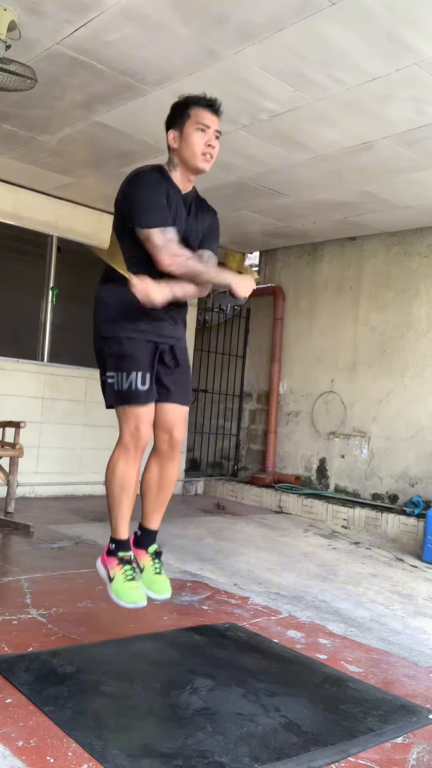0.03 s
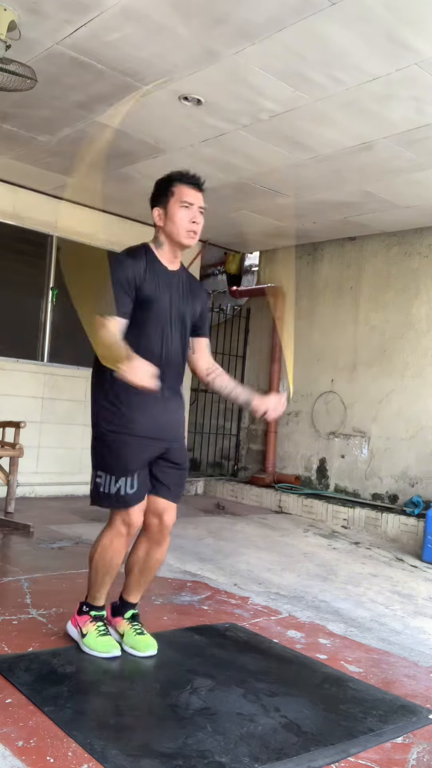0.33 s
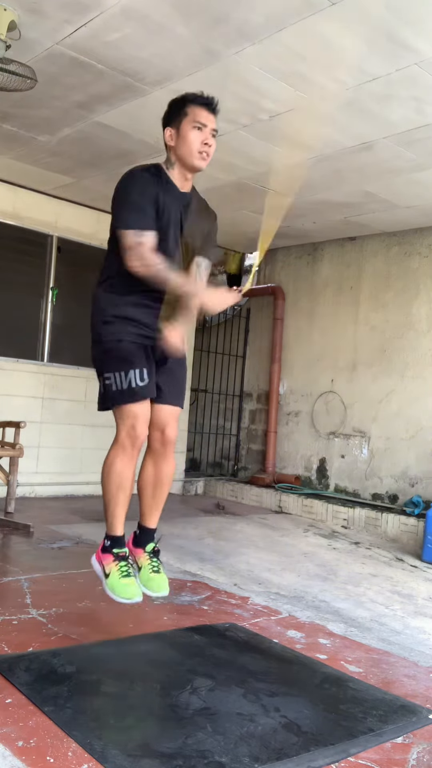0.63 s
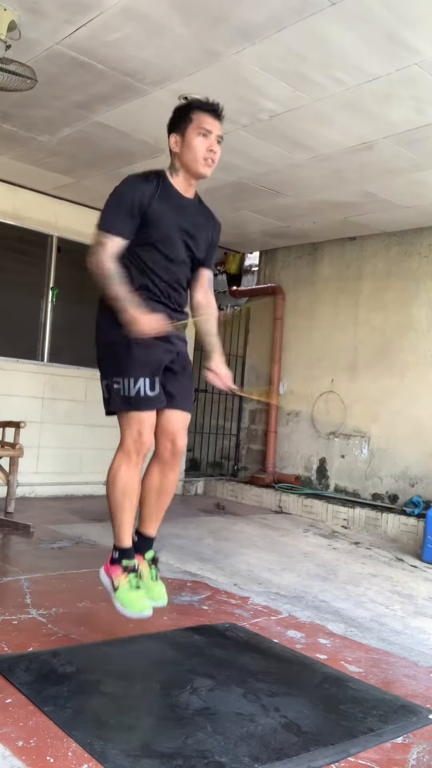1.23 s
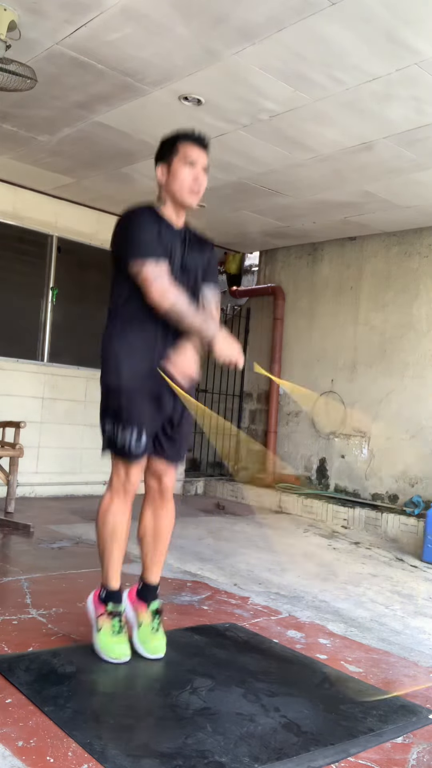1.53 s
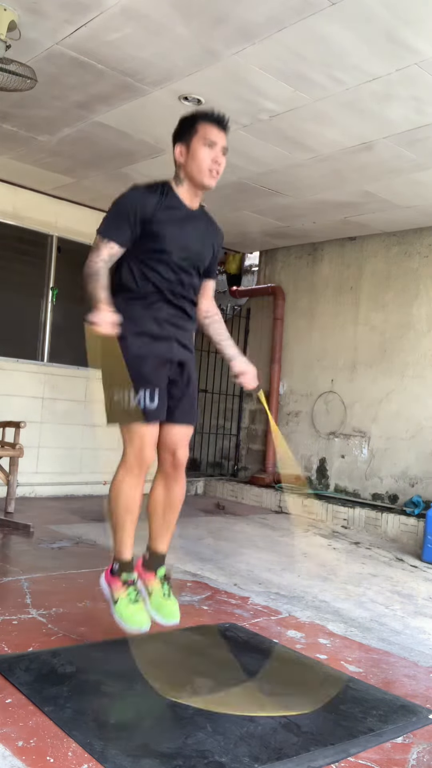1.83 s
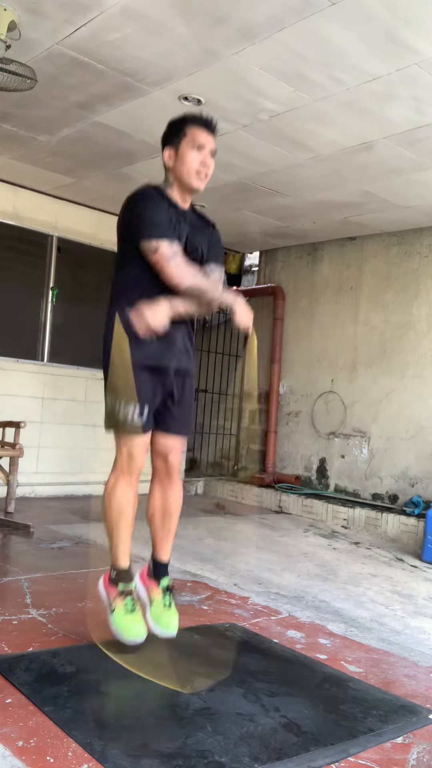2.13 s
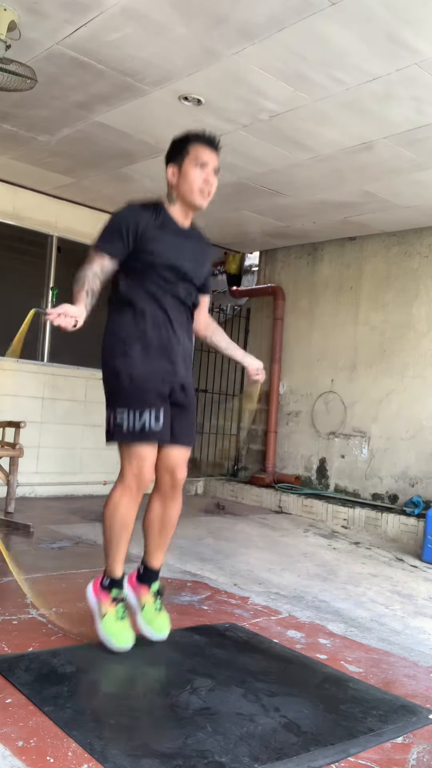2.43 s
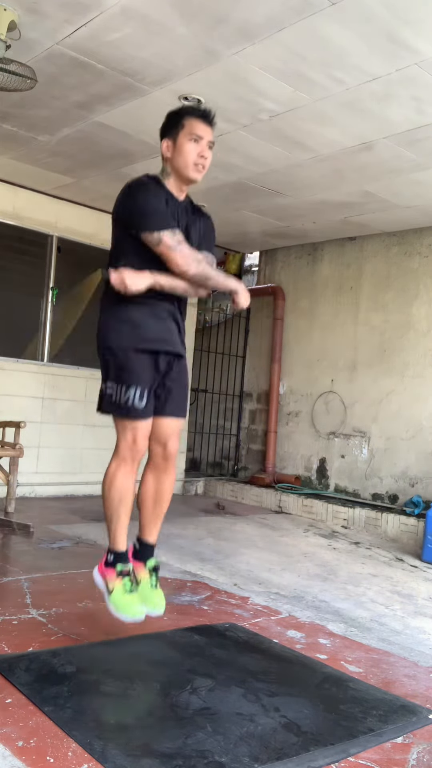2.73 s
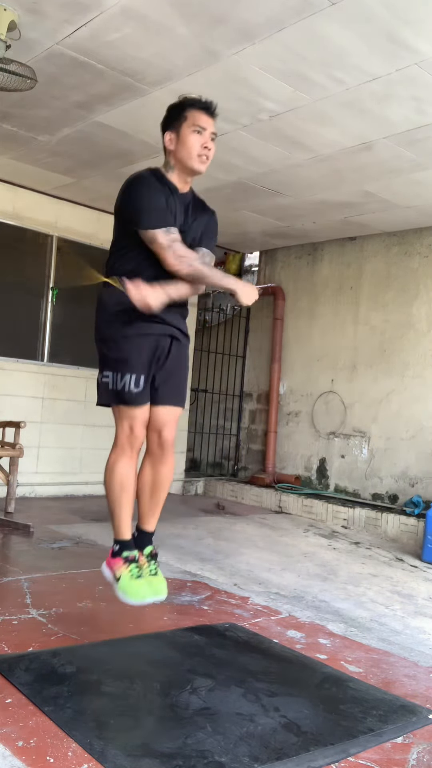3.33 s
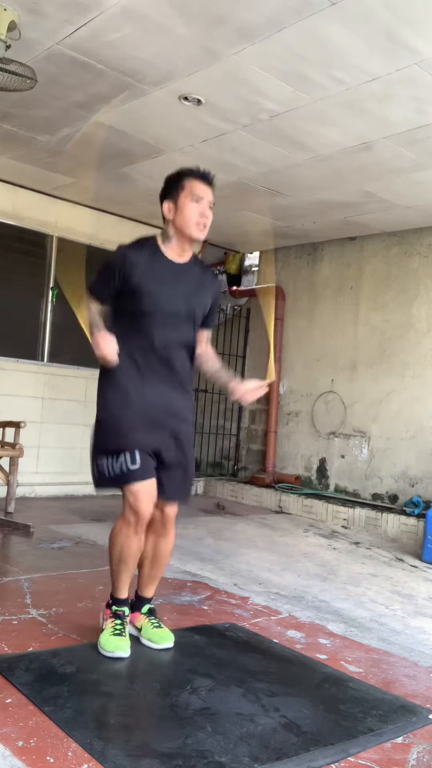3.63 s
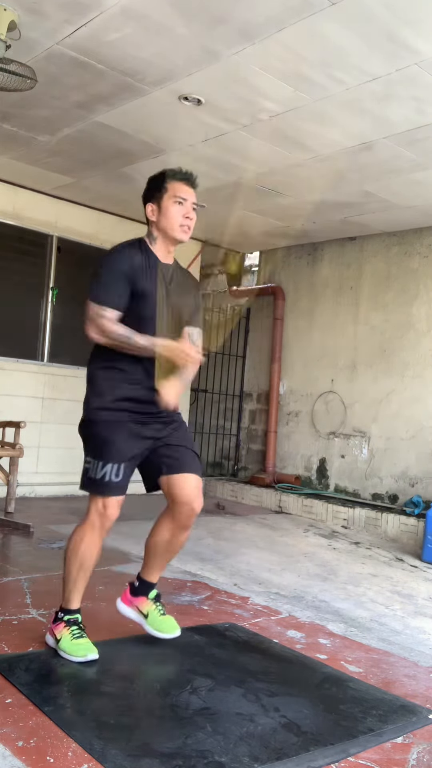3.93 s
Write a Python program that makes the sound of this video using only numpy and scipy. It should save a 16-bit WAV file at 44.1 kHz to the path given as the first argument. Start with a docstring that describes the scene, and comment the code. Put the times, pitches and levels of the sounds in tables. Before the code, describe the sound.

A skipping rope whistles and ticks quickly on a mat between regular shoe landings.

```python
"""Double-unders in a covered concrete patio.

A thin speed rope sings as it cuts the air, swelling with each pass of its loop. It ticks twice
on a rubber mat, then the shoes land. Floor, wall and ceiling throw back each tick before the
patio rings on, over a low distant rumble."""
import sys
import numpy as np
from scipy import signal
from scipy.fft import rfft, irfft
from scipy.io import wavfile

SR = 44100
rng = np.random.default_rng(int(sys.argv[2]) if len(sys.argv) > 2 else 0)


def persist_wave(psi):
    """Save psi, clipped to +-1, as 16-bit WAV."""
    counts = np.round(np.clip(psi, -1, 1) * 32767).astype(np.int16)
    wavfile.write(sys.argv[1], SR, np.atleast_2d(counts).T)


N = 176400

# Air tone swells. Each row: peak time in seconds, nominal pitch in Hz, relative level in dB,
# half-length in seconds, glide in octaves per second.
CORD_SWELLS = [(.042, 1060, -1.5, 0.0071, 5.5), (.075, 1270, -8, 0.0095, 2), (0.13, 900, -12, 0.0065, 0),
               (.17, 1090, 0, .0025, 2), (0.201, 1110, 1.5, 0.0094, 1.5), (0.477, 1058, 1.5, 0.0044, 8.5),
               (0.488, 1402, -1, 0.0027, 10), (0.513, 1080, -7.5, 0.0077, -6.5),
               (0.629, 1255, -5, .015, -1.5), (0.694, 949, -4.5, 0.01, 3.5), (0.746, 1106, -1, .014, 1),
               (1.036, 1417, -3, 0.0052, -2.5), (1.047, 1120, -3.5, 0.0079, -5.5),
               (1.11, 880, -6, 0.0073, 3), (1.17, 1268, -6, 0.021, 1.5), (1.228, 802, -20, 0.0065, -3.5),
               (1.297, 1150, 4, 0.0098, 0), (1.565, 1020, 1.5, 0.0048, -3), (1.6, 1239, -6.5, 0.0063, 2.5),
               (1.712, 1350, -5, .011, 2), (1.831, 1078, -1, 0.013, 3.5), (2.136, 1414, -6, 0.0054, -2),
               (2.162, 1129, 0.5, 0.0066, -2), (2.242, 1087, -1.5, 0.0051, 12),
               (2.288, 1309, -10, 0.016, 2.5), (2.383, 1148, 1.5, 0.002, -0.5),
               (2.414, 1119, 2.5, 0.0079, 0.5), (2.688, 1008, -6.5, 0.004, 5), (2.715, 1206, -6, 0.013, -4),
               (2.826, 1296, -3.5, 0.0081, -3.5), (2.945, 1128, -0.5, 0.011, 6.5),
               (2.9785, 1131, 5.5, 0.0025, 0.5), (3.014, 980, 4.5, 0.003, -6.5),
               (3.254, 1189, -5, .009, 11.5), (3.388, 1303, -6.5, 0.014, 1), (3.491, 1126, 2, 0.0027, 1),
               (3.512, 1134, 0, 0.0093, -2), (3.552, 1000, 6, 0.0042, -5.5), (3.76, 1055, -4, .005, 4.5),
               (3.788, 1265, -3.5, 0.011, 2.5), (3.889, 1102, -9, 0.0056, 0)]
# Whistle pitch, following cord speed. Each row: time in seconds, pitch in Hz.
WHISTLE_PITCH = [(0, 950), (.08, 1380), (.135, 870), (.22, 1200), (.35, 1050), (.41, 800), (.465, 1020),
                 (.49, 1480), (.56, 930), (.615, 1380), (.69, 900), (.76, 1200), (.95, 840), (1.01, 950),
                 (1.035, 1450), (1.10, 880), (1.16, 1350), (1.24, 790), (1.30, 1200), (1.48, 1090),
                 (1.53, 900), (1.565, 1020), (1.595, 1350), (1.67, 880), (1.715, 1380), (1.81, 980),
                 (1.87, 1200), (2.02, 1080), (2.07, 800), (2.12, 950), (2.15, 1400), (2.22, 950),
                 (2.29, 1380), (2.36, 980), (2.41, 1150), (2.58, 1080), (2.63, 860), (2.67, 900),
                 (2.70, 1380), (2.77, 950), (2.84, 1380), (2.91, 820), (2.96, 1200), (3.13, 1040),
                 (3.18, 780), (3.24, 950), (3.27, 1400), (3.33, 900), (3.385, 1350), (3.45, 930),
                 (3.51, 1180), (3.65, 1080), (3.70, 860), (3.75, 1000), (3.80, 1350), (3.85, 800),
                 (3.92, 1200), (4, 950)]
# Hiss of the cord's wake. Each row: frequency in Hz, relative level in dB.
WAKE_SPECTRUM = [(300, -12.5), (700, -18), (1500, 3), (2200, 1), (3600, -0.5), (5000, -7), (9000, -11.5),
                 (16000, -19)]
# Rope on mat. Each row: start in seconds, relative tick level in dB, relative slap level in dB.
ROPE_STRIKES = [(.2376, -1, -4.5), (.5184, -4.5, -5), (.7883, 0.3, -0.5), (1.069, -8.5, -16),
                (1.3351, -2.5, -4.5), (1.6104, -5.5, -8.5), (1.8883, -4.7, -4.5), (2.1692, -3.5, -7),
                (2.4455, -2.4, 0.5), (2.7304, -8.5, -8), (3.0043, -3, -2), (3.2891, -3.5, -4),
                (3.5515, 0.5, -3.5), (3.8188, -7.5, -6.5)]
# Cord contact noise. Each row: frequency in Hz, relative level in dB.
TICK_SPECTRUM = [(400, -8), (1000, 9), (2000, 5), (3200, 5.5), (5000, 2.5), (7500, 1.5), (11500, 1.75),
                 (16000, -3)]
# Ring of the struck mat. Each row: frequency in Hz, relative level in dB, decay in seconds.
MAT_MODES = [(574, -10, 0.0023), (840, 23, 0.0016), (1150, 24, 0.00057), (1710, 2.5, 0.0014),
             (3000, -16, 0.00088)]
# Shoes on mat. Each row: start in seconds, then relative scuff, thud and clap levels in dB.
SHOE_LANDINGS = [(.287, -1, -16, -6), (0.836, 2.5, -1, -3), (1.384, -1.5, -1, -4), (1.941, -1, -1, 2.5),
                 (2.494, -0.5, -2, -10.5), (3.056, 0.5, -18, -6.5), (3.608, -1, -19, 4)]
# Sole touching rubber. Each row: frequency in Hz, relative level in dB.
SCUFF_SPECTRUM = [(60, -3), (120, 3.5), (180, 4), (235, -5.5), (290, -1), (370, -9.5), (500, 3), (750, -4),
                  (1300, -12), (2500, -12.5), (5000, -18), (14000, -25)]
# Forefoot clapping flat. Each row: frequency in Hz, relative level in dB.
CLAP_SPECTRUM = [(100, -6), (250, -21), (390, -15), (520, 3), (750, 5), (1200, -8), (3000, -34),
                 (14000, -31.5)]
# Floor, wall, ceiling. Each row: delay in seconds, relative level in dB, left-side lag in seconds.
REFLECTIONS = [(.0024, -16.5, 0.00013), (.0076, -3.5, .00014), (0.0118, -6, .00009)]
# Patio reverberation. Each row: frequency in Hz, time to fall 60 dB in seconds.
PATIO_T60 = [(60, 0.27), (250, 0.53), (1000, 0.84), (2500, 0.57), (6000, 0.53), (15000, 0.37)]
# Distant rumble. Each row: frequency in Hz, relative level in dB.
RUMBLE_SPECTRUM = [(20, -44), (35, -12), (50, -8), (68, -5), (95, -1.5), (130, -11), (200, -15), (350, -32),
                   (800, -8), (2000, -24), (5000, -32), (16000, -37.5)]
# Hum within the rumble. Each row: frequency in Hz, level in dB.
HUM_TONES = [(69.5, -47.5), (89, -75), (161, -60.5)]


def whoosh(t):
    """The cord whistles up and down with its speed; each fast sweep adds a gliding swell and hiss."""
    glide_limit_oct, drive_span_s, idle_drive = 0.3, 0.042, 0.55
    swells, effort, drive = np.zeros((3, N))
    for at_s, hz, db, half_s, glide_oct_per_s in CORD_SWELLS:
        age_s = t - at_s
        near = np.abs(age_s) < 0.25
        envelope = undb(db) * np.exp(-(age_s / (2 * half_s)) ** 2)
        bend_oct = glide_limit_oct * np.tanh(glide_oct_per_s * age_s[near] / glide_limit_oct)
        swells[near] += envelope[near] * air_tone(0.98 * hz * 2 ** bend_oct, width_hz=0.168 * hz)
        effort += envelope
        skewed_s = np.where(age_s < 0, 2 * age_s, age_s)  # rises twice as fast as it falls
        drive = np.maximum(drive, np.exp(-(skewed_s / (2 * drive_span_s)) ** 2))
    pitch_hz = np.interp(t, *np.array(WHISTLE_PITCH).T)
    width_hz, slow_width_hz = 0.076 * pitch_hz.mean(), 0.091 * pitch_hz.mean()
    fast = air_tone(pitch_hz, width_hz) * np.maximum(drive, idle_drive)
    slow = undb(-4) * air_tone(0.8 * pitch_hz, slow_width_hz) * drive  # cord nearer the hands
    overtone = undb(-26.5) * air_tone(3 * pitch_hz, 3 * width_hz) * drive
    hiss = effort * colour(rng.standard_normal(N), WAKE_SPECTRUM)
    return undb(-22) * swells + undb(-32) * (fast + slow + overtone) + undb(-36.5) * hiss


def air_tone(hz, width_hz):
    """Tone of wandering strength and phase, as from vortices shed by a cord; rms 1."""
    lowpass = signal.butter(3, width_hz / 2, fs=SR, output="sos")
    noise = rng.standard_normal(len(hz) + SR) + 1j * rng.standard_normal(len(hz) + SR)
    wander = signal.sosfilt(lowpass, noise)[SR:]
    wander /= np.sqrt(np.abs(wander) + 1e-9)  # evens the level
    return unit(np.real(wander * np.exp(2j * np.pi * np.cumsum(hz) / SR)))


def rope_strikes(t):
    """Crack, brief skid and slap of the mat; each strike hits a new spot, with its own echoes."""
    skid_decay_s, slap_highpass_hz, crack_samples = 0.003, 630, 256
    strikes, age_s = np.zeros((2, N + SR)), t[:SR]
    ring = -sum(undb(db) * np.sin(2 * np.pi * hz * age_s) * np.exp(-age_s / decay_s)
                for hz, db, decay_s in MAT_MODES)
    ring = signal.sosfilt(signal.butter(2, slap_highpass_hz, "high", fs=SR, output="sos"), ring)
    ring /= np.linalg.norm(ring)
    skid = np.exp(-age_s / skid_decay_s)
    skid *= undb(-11) / np.linalg.norm(skid)
    for at_s, tick_db, slap_db in ROPE_STRIKES:
        contact = np.pad(crack(crack_samples), (0, SR - crack_samples)) + skid * rng.standard_normal(SR)
        tick = colour(np.roll(contact, crack_samples), TICK_SPECTRUM)  # lead-in for filter pre-ring
        start = int(at_s * SR)
        lead_in = start - crack_samples
        strikes[:, lead_in:lead_in + SR] += undb(tick_db + 8.5) * patio(tick, early_db=-2.5, tail_db=0.5)
        strikes[:, start:start + SR] += undb(slap_db + 7) * patio(ring, early_db=-6.5, tail_db=-0.1)
    return strikes[:, :N]


def crack(size, decay_s=0.0004):
    """Very short burst of contact noise with an even spectrum."""
    burst = np.exp(-np.arange(size) / SR / decay_s) * rng.standard_normal(size)
    spectrum = rfft(burst, 2 * size)
    return irfft(spectrum / np.abs(spectrum))[:size]


def soles(t):
    """Two soles touch the rubber in quick succession; a forefoot claps flat."""
    rise_s, fall_s, second_foot_s = 0.0011, 0.02, 0.0295
    clap_lag_s, clap_fall_s = 0.014, 0.005
    press, clap = np.zeros((2, N))
    for at_s, scuff_db, _, clap_db in SHOE_LANDINGS:
        for lag_s in (0, second_foot_s):
            age_s = np.maximum(t - at_s - lag_s, 0)
            press += undb(scuff_db) * (1 - np.exp(-age_s / rise_s)) * np.exp(-age_s / fall_s)
        age_s = t - at_s - clap_lag_s
        clap += undb(clap_db) * (age_s > 0) * np.exp(-np.abs(age_s) / clap_fall_s)
    scuffs = undb(-27.5) * press * colour(rng.standard_normal(N), SCUFF_SPECTRUM)
    claps = undb(-17) * clap * colour(rng.standard_normal(N), CLAP_SPECTRUM)
    return scuffs + claps


def thuds(t, hz=70, lag_s=0.0296, rise_s=0.019):
    """Body weight sinks into the mat: a few low cycles per landing."""
    heels_s, heels_db = 3.655, -25.5  # the last landing sinks onto the heels
    loads = [(at_s + lag_s, thud_db - 34.5) for at_s, _, thud_db, _ in SHOE_LANDINGS]
    weight = np.zeros(N)
    for at_s, db in loads + [(heels_s, heels_db)]:
        age_s = np.maximum(t - at_s, 0)
        envelope = age_s / rise_s * np.exp(1 - age_s / rise_s)
        weight += undb(db) * envelope * np.sin(2 * np.pi * hz * age_s)
    return weight


def patio(x, early_db, tail_db):
    """Direct sound from the side, dulled by shading; hard bright reflections; then the tail."""
    left_lag_s, shade_hz = 0.00011, 6940
    direct = np.zeros((2, SR))
    direct[0, int(left_lag_s * SR)] = direct[1, 0] = 1
    response = signal.sosfilt(signal.butter(1, shade_hz, fs=SR, output="sos"), direct)
    response += undb(tail_db) * patio_tail()
    for delay_s, db, lag_s in REFLECTIONS:
        response[0, int((delay_s + lag_s) * SR)] += undb(db + early_db)
        response[1, int(delay_s * SR)] += undb(db + early_db)
    energy = 1 + undb(tail_db) ** 2 + sum(undb(db + early_db) ** 2 for _, db, _ in REFLECTIONS)
    return signal.fftconvolve(x[None], response / np.sqrt(energy), axes=1)[:, :len(x)]


def patio_tail(build_s=0.0043, clump_s=0.0036, clump_db=3):
    """Clumps of echoes build up and die away, the midrange last; energy about 1 per side."""
    t, hz = np.arange(SR) / SR, np.fft.rfftfreq(SR, 1 / SR)
    clumps = undb(clump_db * np.interp(t / clump_s, np.arange(SR), rng.standard_normal(SR)))
    spectrum = rfft(diffuse(SR) * clumps)
    tail = np.zeros((2, SR))
    for centre_hz, t60_s in PATIO_T60:
        band = along([(point_hz, point_hz == centre_hz) for point_hz, _ in PATIO_T60], hz)
        tail += irfft(spectrum * band, SR) * undb(-60 * t / t60_s)
    return unit(tail * (1 - np.exp(-t / build_s))) / np.sqrt(SR)


def lingering_tick(ago_s=0.024):
    """A strike just before the start still rings in the patio."""
    tail = patio_tail()[:, int(ago_s * SR):]
    return undb(-1) * colour(np.pad(tail, ((0, 0), (0, N - tail.shape[1]))), TICK_SPECTRUM)


def rumble():
    """Distant rumble with a slightly wavering hum."""
    hum = sum(undb(db) * air_tone(np.full(N, hz), width_hz=2.4) for hz, db in HUM_TONES)
    return undb(-38) * colour(diffuse(N), RUMBLE_SPECTRUM) + hum


def diffuse(size, spacing_m=0.19, sound_m_per_s=343):
    """Noise from all around at two points: alike in the bass, unrelated in the treble."""
    coherence = np.sinc(2 * np.fft.rfftfreq(size, 1 / SR) * spacing_m / sound_m_per_s)
    weights = np.sqrt([(1 + coherence) / 2, (1 - coherence) / 2])
    mid, side = rfft(rng.standard_normal((2, size))) * weights
    return irfft(np.array([mid + side, mid - side]), size)


def colour(x, points):
    """Filter by (Hz, dB) points; white noise keeps its power."""
    size = x.shape[-1]
    gain = unit(undb(along(points, np.fft.rfftfreq(size, 1 / SR))))
    return irfft(rfft(x) * gain, size)


def along(points, hz):
    """Interpolate (Hz, value) points on a log-frequency axis."""
    point_hz, values = np.array(points).T
    return np.interp(np.log(hz + 1), np.log(point_hz), values)


def undb(db):
    """Decibels to gain."""
    return 10 ** (np.asarray(db) / 20)


def unit(x):
    """Scale to rms 1."""
    return x / np.sqrt(np.mean(x ** 2))


def scene():
    """Rope and shoes in the patio; the whoosh is a little louder on the left."""
    t = np.arange(N) / SR
    footfalls = soles(t)
    rope = patio(whoosh(t), early_db=-7, tail_db=-2.3) * undb([[1], [-1]])
    strikes = rope_strikes(t)
    shoes = patio(footfalls, early_db=3, tail_db=-0.5) + thuds(t)
    return rope + strikes + shoes + lingering_tick() + rumble()


def record(dry):
    """The left side leads in phase in the bass; the deepest lows and the top are cut."""
    lead_rad, lead_corner_hz, highpass_hz, lowpass_hz = 0.43, 300, 36, 16000
    hz = np.fft.rfftfreq(N, 1 / SR)
    phase_rad = lead_rad * np.exp(-(hz / lead_corner_hz) ** 2)
    wet = irfft(rfft(dry) * np.exp(0.5j * np.array([phase_rad, -phase_rad])), N)
    wet = signal.sosfilt(signal.butter(3, highpass_hz, "high", fs=SR, output="sos"), wet)
    return signal.sosfilt(signal.ellip(8, 0.2, 70, lowpass_hz, fs=SR, output="sos"), wet)


dry = scene()
out = record(dry)
persist_wave(out)
```